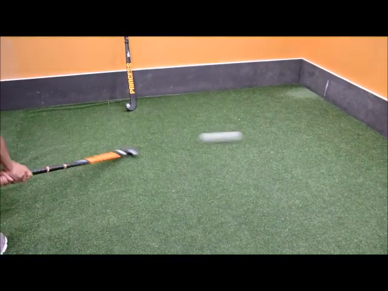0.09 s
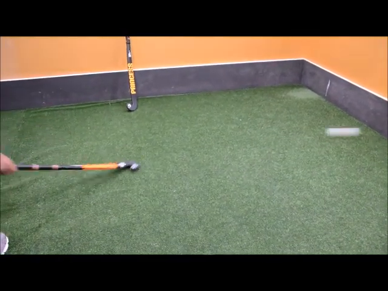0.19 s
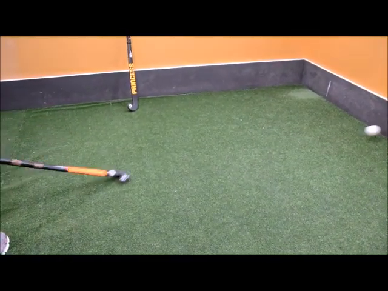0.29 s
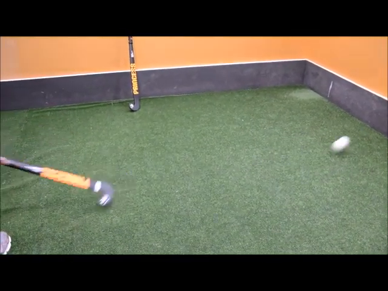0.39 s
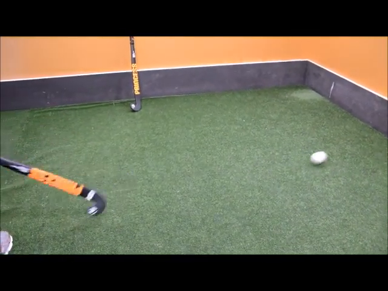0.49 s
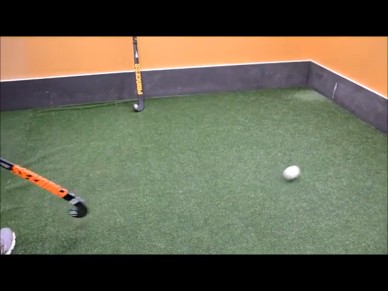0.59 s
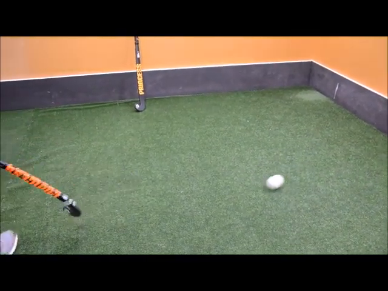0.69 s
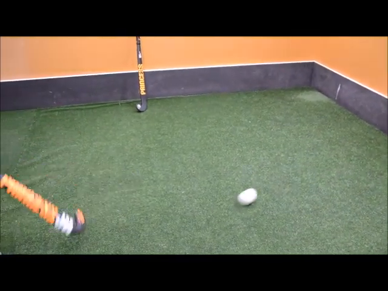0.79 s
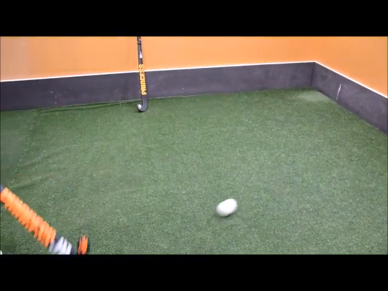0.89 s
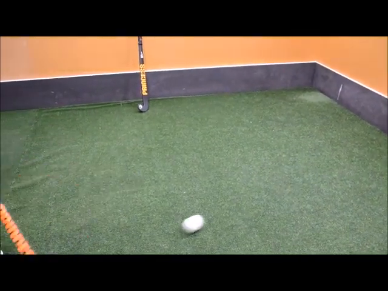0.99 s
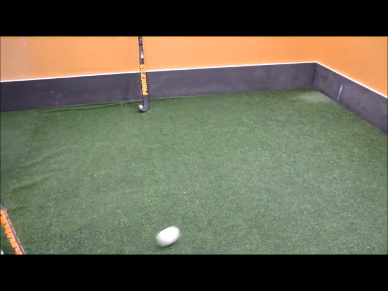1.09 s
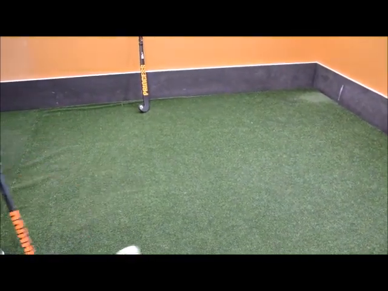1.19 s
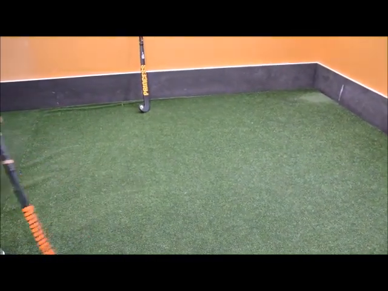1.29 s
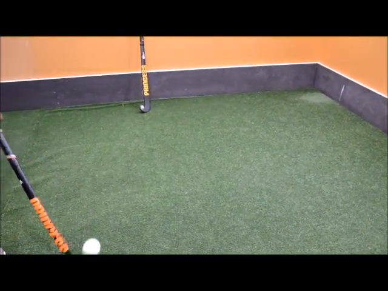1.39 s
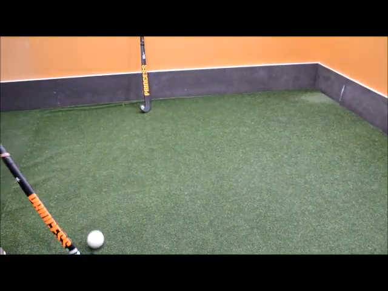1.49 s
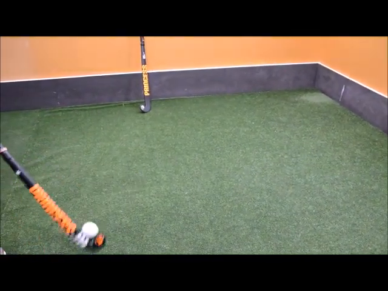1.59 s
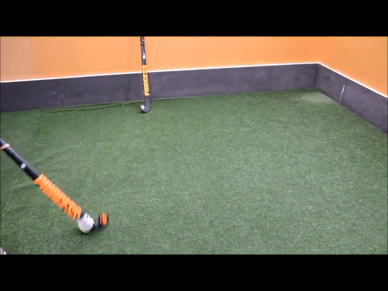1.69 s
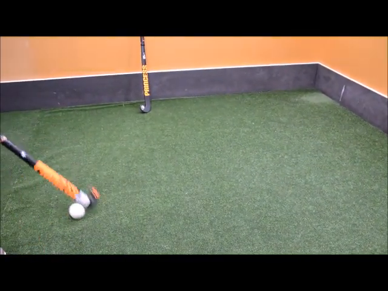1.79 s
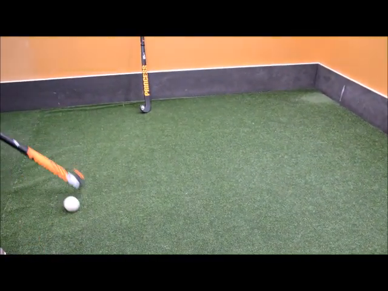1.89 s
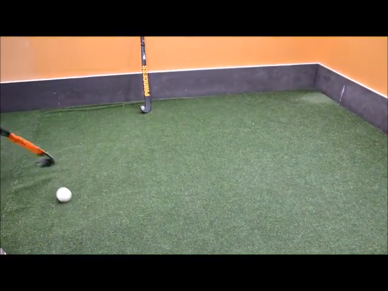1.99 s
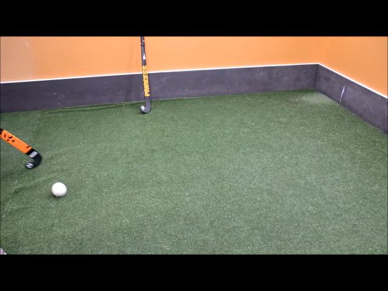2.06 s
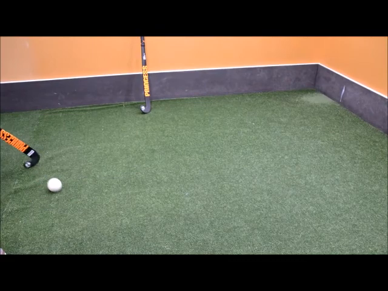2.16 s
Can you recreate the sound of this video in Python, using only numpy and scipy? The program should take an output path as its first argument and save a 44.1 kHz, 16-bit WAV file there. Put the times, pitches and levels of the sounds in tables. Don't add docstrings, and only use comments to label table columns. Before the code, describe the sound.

A hard hockey ball slams a wooden board with a distorted, booming crack after a fading shot echo; later a sharp stick knock stops it, then a lighter tap, with turf scuffs in a small reverberant hall.

```python
import sys
import numpy as np
from scipy import signal
from scipy.fft import rfft, irfft
from scipy.io import wavfile
from scipy.ndimage import uniform_filter1d

SR = 44100
rng = np.random.default_rng(int(sys.argv[2]) if len(sys.argv) > 2 else 0)


def pcm_store(signal):
    levels = np.round(np.clip(np.atleast_2d(signal), -1, 1) * 32767)
    wavfile.write(sys.argv[1], SR, levels.astype(np.int16).T)


def gain_from_db(level_db):
    decades = np.asarray(level_db, float) / 20
    return 10 ** decades


N = 97020

SHOT_S, SLAM_S, STOP_S, TAP_S = -0.06, 0.2229, 1.2969, 1.6727

# ringing level in dB, click level in dB, snap level in dB,
# snap pitch in Hz, room sound over direct sound in dB.
SHOT_BLOW = (-4, 6, -19, 7000, 6)
SLAM_BLOW = (20.5, 22.5, -2.5, 6205, 6)
STOP_BLOW = (8.5, 4, -20.5, 12000, 4.5)
TAP_BLOW = (-8.5, -4, -33, 9500, 4)

# pitch in Hz, level in dB, time to fade by 60 dB in seconds.
SHOT_TONES = [(514, -8, 0.0067), (810, -6.5, 0.035), (1020, 5, 0.012), (1565, -10.5, .02),
              (3670, -7, 0.0084)]
BOARD_TONES = [(100, -10, 0.18), (166, -12, 0.076), (222, -3, 0.08), (329.7, 2.5, .07), (381.5, 5.5, 0.062),
               (527, -2, 0.042), (674, -2.5, 0.045), (854, -10.5, 0.037), (1064, -10.5, 0.041),
               (1380, -5, 0.015), (1710, -10.5, 0.012)]
STOP_TONES = [(572, -9, 0.034), (740, 4.5, 0.068), (980, -20, 0.015), (1185, 8, 0.023), (1313, 14, 0.019),
              (1660, 5, 0.022), (1711, 9.5, 0.03), (3100, 6, 0.0042), (4070, -6, 0.0046)]
TAP_TONES = [(294, 8, 0.047), (585, -33, 0.022), (762, 5, 0.031), (895, 4, 0.033), (1258, 11.5, 0.031),
             (1680, 6, 0.049), (3500, 5, 0.018), (4240, -29, 0.0094)]

# frequency in Hz, level in dB.
SHOT_CLICK = [(60, -41.5), (200, -29.5), (450, -9), (950, -2), (2000, -11.5), (3700, -12.5), (6000, -26),
              (16000, -41)]
BOARD_CLICK = [(30, -28), (70, -16.5), (350, 1), (800, -2.5), (2000, -16), (3500, -20.5), (8000, -36.5),
               (16000, -52.5)]
STOP_CLICK = [(60, -53), (150, -18), (500, -0.5), (1300, 1.5), (2300, 2), (4000, -8), (8000, -21),
              (16000, -29.5)]
TAP_CLICK = [(60, -28), (150, -15.5), (350, -0.5), (1200, 1.5), (2200, -9), (4000, -6), (7000, -22.5),
             (16000, -36.5)]

# delay in seconds, level in dB.
BOARD_ECHOES = [(.0053, -5.5), (.0100, -7), (.0150, -14.5), (0.0201, -13)]
STICK_ECHOES = [(.0100, -5.5), (.0145, -22), (0.0173, -17)]
TAP_ECHOES = [(.0090, -7.5), (.0137, -17), (.0185, -9), (.0328, -18)]

# frequency in Hz, time to fade by 60 dB in seconds.
ROOM_FADE = [(50, .4), (100, .45), (260, 0.55), (700, 0.77), (1800, 0.53), (4800, 0.5), (9000, .45),
             (15000, 0.42)]

# pitch in Hz, level in dB, time to fade by 60 dB in seconds.
BOOM_TONES = [(84, -36, 1.5), (86, -34.5, 1.7), (142.3, -29, .8), (231, -46.5, 2.5), (300, -41, 0.75),
              (370, -35, 1.1), (500, -32, 1.6)]

# start in seconds, length in seconds, level in dB, brightness in dB per octave.
SCUFFS = [(0.097, 0.069, -54, 4), (0.168, 0.073, -51.5, -0.5), (0.436, 0.018, -50, 3),
          (0.553, 0.043, -53.5, -0.5), (0.603, 0.074, -52, 0), (.685, .004, -55, 8), (0.715, .008, -54, 6),
          (0.726, 0.041, -44.5, 0), (0.914, 0.017, -58, -2), (1.293, 0.0061, -47, 18),
          (1.471, 0.0068, -36, -3.5), (1.59, 0.021, -53, -3), (1.884, 0.011, -56, 0),
          (2.08, .06, -67.5, -15.5)]

# frequency in Hz, level in dB.
TURF_COLOUR = [(590, -39), (1000, -7.5), (2030, -5), (2870, -9.5), (3540, -3.5), (5020, -14.5), (7980, -18),
               (16000, -41.5)]

# start in seconds, level in dB, pitch in Hz.
STEPS = [
    (.13, -56, 60),
    (1.472, -43, 100),
    (1.618, -54, 70),
    (2.129, -57, 114.6),
]

# frequency in Hz, level in dB.
HUM_COLOUR = [(25, -29.5), (60, -7.5), (110, -6.5), (200, -10.5), (500, -17.5), (1200, -14), (2400, -20.5),
              (3800, -21), (16000, -45.5)]

# pitch in Hz, level in dB.
HUM_TONES = [(92, -77), (226, -71), (1265, -71.5), (3700, -70.5)]


def evened(x):
    return x / np.sqrt(np.mean(x ** 2) + 1e-20)


def unit(x):
    return x / np.linalg.norm(x)


def read(points, hz):
    f, value = np.transpose(points)
    return np.interp(np.log(hz + 1), np.log(f + 1), value)


def add(mix, start_s, sound):
    at = round(start_s * SR)
    sound = sound[max(-at, 0):]
    part = mix[max(at, 0):][:len(sound)]
    part += sound[:len(part)]


def hum():
    hz = np.fft.rfftfreq(N, 1 / SR)
    wash = irfft(rfft(rng.standard_normal(N)) * gain_from_db(read(HUM_COLOUR, hz)), N)
    out = gain_from_db(-58.5) * evened(wash)
    for tone_hz, db in HUM_TONES:
        blur_hz = 4 + 0.02 * tone_hz
        narrow = 1 / (1 + ((hz - tone_hz) / blur_hz) ** 2)
        out += gain_from_db(db) * evened(irfft(rfft(rng.standard_normal(N)) * narrow, N))
    return out


def click(points):
    hz = abs(np.fft.fftfreq(4096, 1 / SR))
    log = np.log(gain_from_db(np.maximum(read(points, hz), -100)))
    knock = np.fft.ifft(np.exp(log - 1j * signal.hilbert(log).imag)).real
    return unit(knock[:2048])


def ring(tones, t):
    return sum(gain_from_db(db - 60 * t / fade_s) * np.sin(2 * np.pi * hz * t) for hz, db, fade_s in tones)


def room():
    build_s = 0.0058
    hz, t, z = signal.stft(rng.standard_normal(SR * 2), SR, nperseg=512)
    fading = z * gain_from_db(-60 * t / read(ROOM_FADE, hz)[:, None])
    tail = signal.istft(fading, SR, nperseg=512)[1]
    t = np.arange(len(tail)) / SR
    return unit(tail * (1 - np.exp(-(t / build_s) ** 2)))


def blow(row, tones, colour, echoes):
    ring_db, click_db, snap_db, snap_hz, room_db = row
    rise_s, chatter_s, snap_s = 0.00058, 0.0015, 0.00015
    t = np.arange(SR // 4) / SR

    body = gain_from_db(ring_db) * unit(ring(tones, t) * (1 - np.exp(-t / rise_s)))
    knock = gain_from_db(click_db) * click(colour)
    tail = room()
    heard = gain_from_db(room_db) * signal.fftconvolve(body, tail)
    add(heard, 0, gain_from_db(room_db) * signal.fftconvolve(knock, tail))

    chatter = unit(rng.choice([-1.0, 1.0], 512) * np.exp(-t[:512] / chatter_s))
    direct = body
    add(direct, 0, signal.fftconvolve(knock, chatter))
    snap_shape = np.e * t / snap_s * np.exp(-t / snap_s)
    direct += gain_from_db(snap_db) * snap_shape * np.sin(2 * np.pi * snap_hz * t)

    heard[:len(direct)] += direct
    for delay_s, db in echoes:
        add(heard, delay_s, -gain_from_db(db) * direct)
    return heard


def shot():
    return blow(SHOT_BLOW, SHOT_TONES, SHOT_CLICK, STICK_ECHOES)


def scuffs():
    grain_db, room_db = -2, -1
    out = np.zeros(N)
    t, hz = np.arange(8192) / SR, np.fft.rfftfreq(8192, 1 / SR)
    for start_s, length_s, db, tilt_db in SCUFFS:
        noise, grain = rng.standard_normal((2, 8192))
        shade = gain_from_db(read(TURF_COLOUR, hz) + tilt_db * np.log2(hz / 4000 + 0.01))
        shade *= np.minimum(hz / 1200, 1) ** 2
        grainy = noise * gain_from_db(grain_db * evened(uniform_filter1d(grain, 60)))
        hiss = evened(irfft(rfft(grainy) * shade))
        u = t / length_s
        swell = np.minimum(5 * u, 1) * np.exp(-u ** 2)
        add(out, start_s, gain_from_db(db) * hiss * swell)
    return out + gain_from_db(room_db) * signal.fftconvolve(out, room())[:N]


def steps():
    thump_s = 0.01
    out, t = np.zeros(N), np.arange(SR // 4) / SR
    push = np.e * t / thump_s * np.exp(-t / thump_s)
    for start_s, db, hz in STEPS:
        add(out, start_s, gain_from_db(db) * push * np.sin(2 * np.pi * hz * t))
    return out


def slam():
    return blow(SLAM_BLOW, BOARD_TONES, BOARD_CLICK, BOARD_ECHOES)


def boom():
    t = np.arange(SR * 2) / SR
    return ring(BOOM_TONES, t) * (1 - np.exp(-t / 0.05))


def stop():
    return blow(STOP_BLOW, STOP_TONES, STOP_CLICK, STICK_ECHOES)


def tap():
    return blow(TAP_BLOW, TAP_TONES, TAP_CLICK, TAP_ECHOES)


def scene():
    mix = hum() + scuffs() + steps()
    add(mix, SHOT_S, shot())
    add(mix, SLAM_S, slam())
    add(mix, SLAM_S, boom())
    add(mix, STOP_S, stop())
    add(mix, TAP_S, tap())
    return mix[None]


def band_limit(x):
    return signal.sosfilt(signal.butter(12, 16760, fs=SR, output="sos"), x)


def record(dry):
    overload, knee = 1.0, 9
    bass_cut = signal.butter(2, 70, "high", fs=SR, output="sos")
    heard = signal.sosfilt(bass_cut, dry)
    flat = heard / (1 + abs(heard / overload) ** knee) ** (1 / knee)
    treble_cut = signal.firwin(511, 16500, window=("kaiser", 9), fs=SR)
    flat = signal.oaconvolve(flat, treble_cut[None], "same")
    return band_limit(np.clip(flat, -1, 1))


dry = scene()
out = record(dry)
pcm_store(out)
```